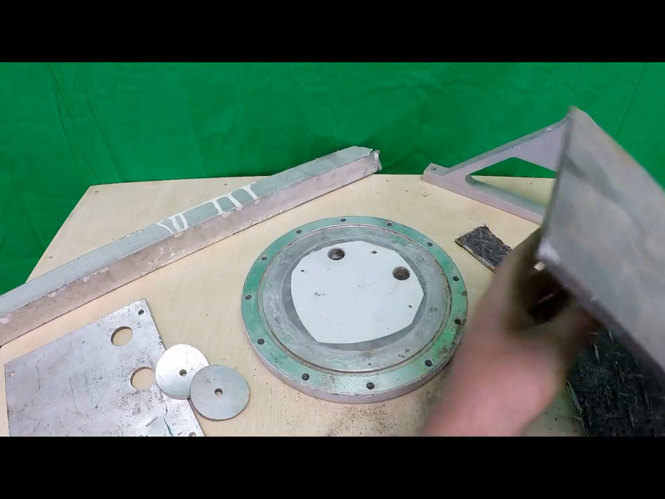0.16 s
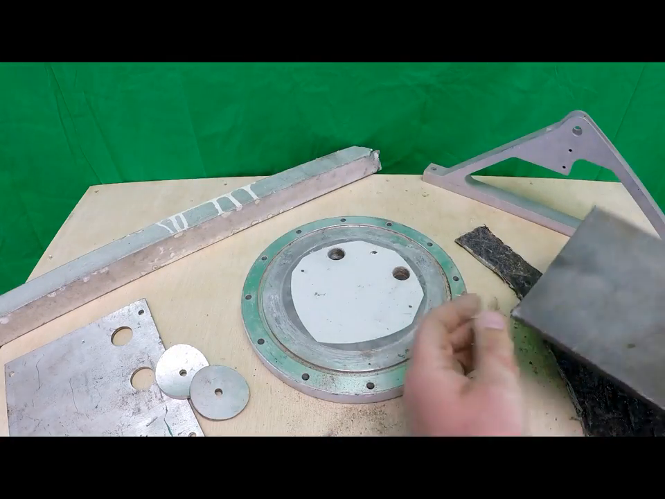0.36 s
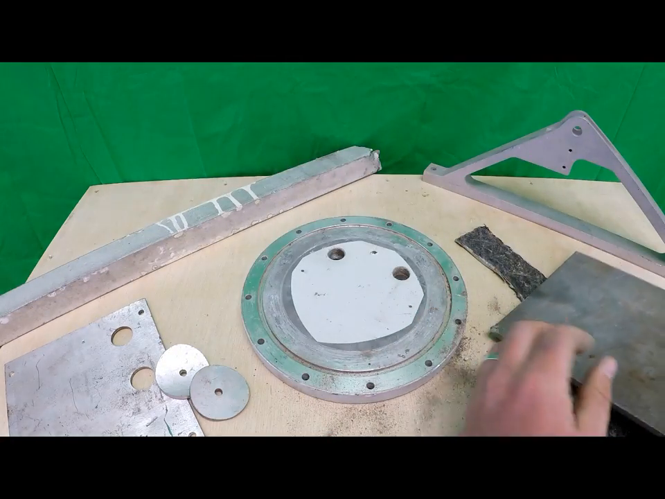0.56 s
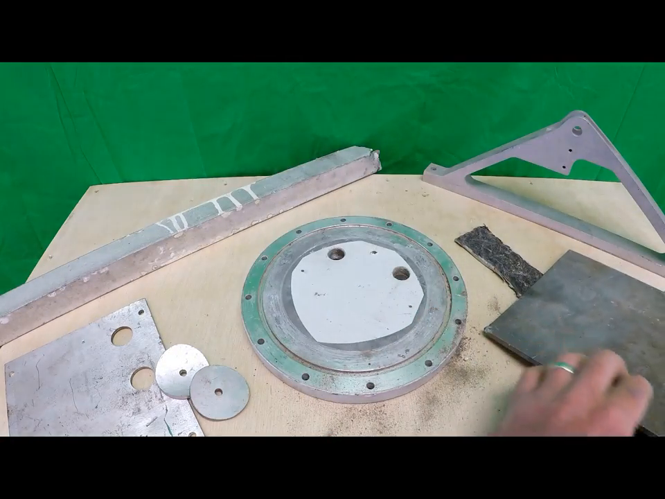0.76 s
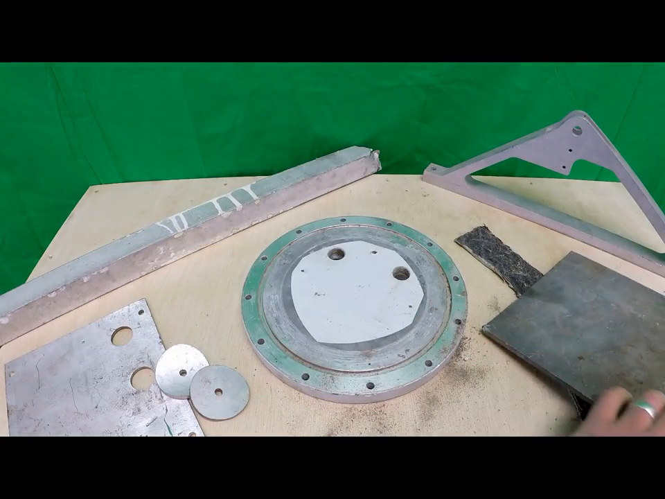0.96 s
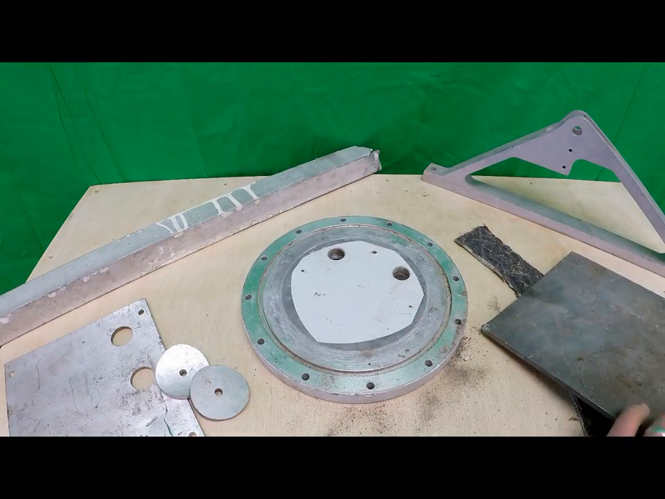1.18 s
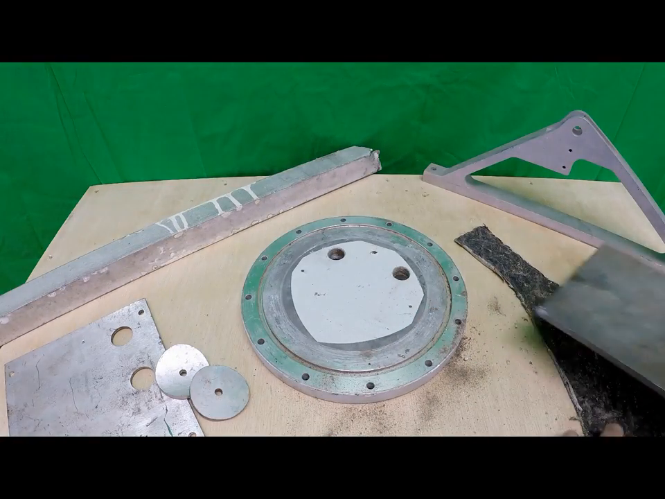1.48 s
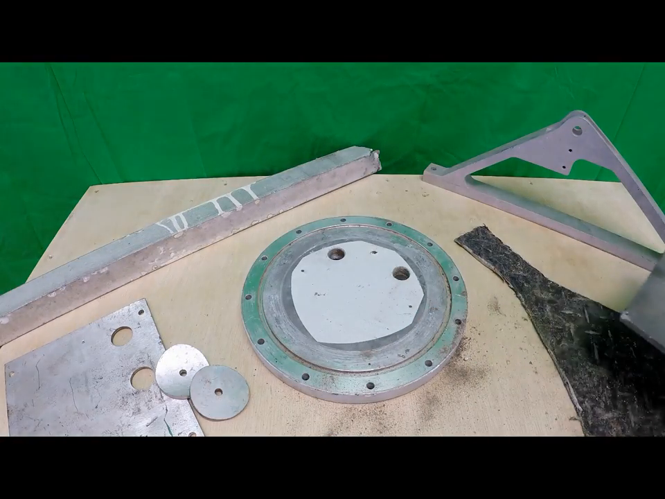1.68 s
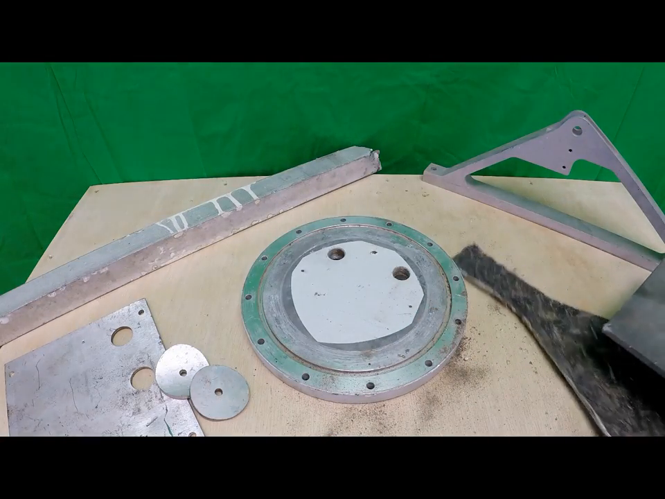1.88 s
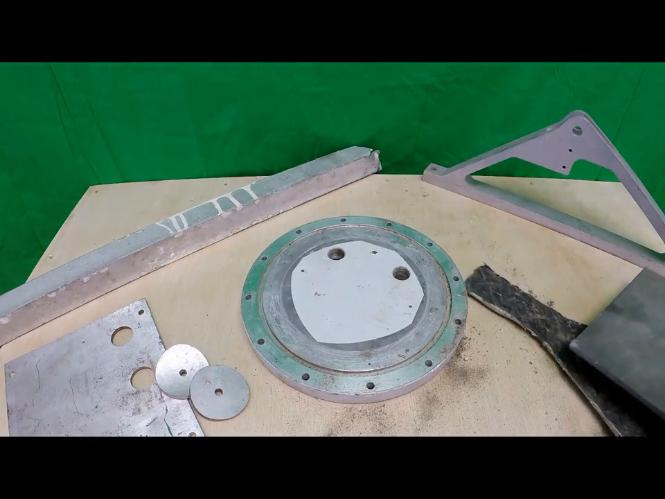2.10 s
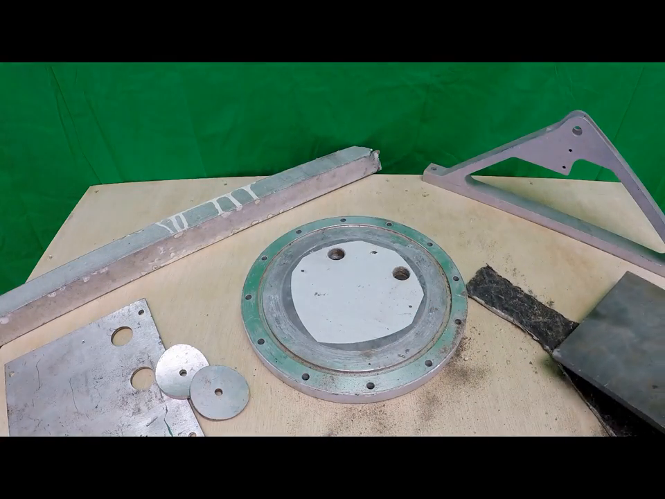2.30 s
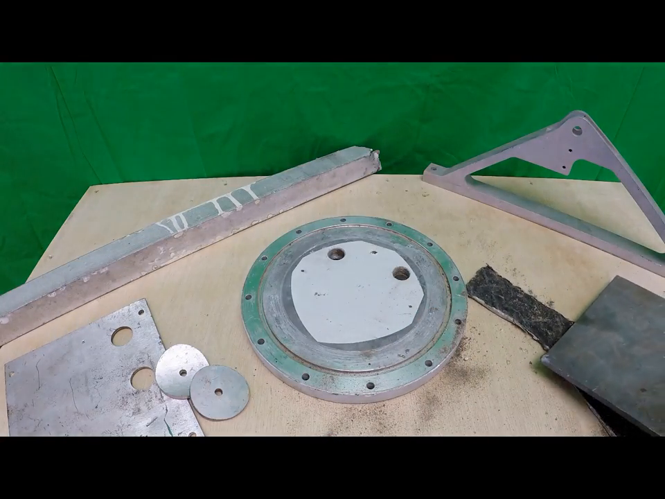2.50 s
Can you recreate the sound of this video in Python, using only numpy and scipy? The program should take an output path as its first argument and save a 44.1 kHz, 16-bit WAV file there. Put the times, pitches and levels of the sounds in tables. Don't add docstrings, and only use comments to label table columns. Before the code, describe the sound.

A metal plate knocks on a wooden table. Quiet room hum opens, with tiny ticks near 0.6 s; the plate lands with a boomy double thud at 0.7-0.9 s. Faint scrapes and sleeve rustle follow around 1.4 s, then a dull bump at 1.7 s. From 1.9 to 2.3 s it drags loudly, clanking, gritty and briefly juddering, then drops with a low thud and quickly fades in the small room.

```python
import sys
import numpy as np
from scipy import signal
from scipy.fft import rfft, irfft
from scipy.io import wavfile
from scipy.ndimage import uniform_filter1d

SR = 44100
rng = np.random.default_rng(int(sys.argv[2]) if len(sys.argv) > 2 else 0)


def log_audio(samples):
    frames = np.atleast_2d(samples).T
    limited = np.clip(frames, -1, 1)
    pcm = np.round(limited * 32767).astype(np.int16)
    wavfile.write(sys.argv[1], SR, pcm)


def invert_db(x):
    u = np.asarray(x, float) / 20
    return 10 ** u


N = 116865


def evened(x):
    return x / np.sqrt(np.mean(x ** 2) + 1e-20)


def read(points, hz):
    f, value = np.transpose(points)
    return np.interp(np.log(hz + 1), np.log(f + 1), value)


def colour(x, points):
    hz = np.fft.rfftfreq(N, 1 / SR)
    return evened(irfft(rfft(x) * invert_db(read(points, hz)), N))


def drift(seconds):
    size = round(seconds * SR)
    smooth = uniform_filter1d(rng.standard_normal(N), size)
    return evened(uniform_filter1d(smooth, size))


def ports(x, other, balance, phase, same):
    hz = np.fft.rfftfreq(N, 1 / SR)
    c = np.clip(read(same, hz), 0, 1)
    half = invert_db(read(balance, hz) / 2) * np.exp(.5j * read(phase, hz))
    a, b = rfft(x), rfft(other)
    first = a * half
    second = (c * a + np.sqrt(1 - c * c) * b) / half
    return irfft(np.array([first, second]) / abs(half + c / half) * 2, N)


# time_s, level_db, top_hz
SLEEVES = [(0, -90.5, 12600), (0.4, -86.5, 12600), (.51, -81.5, 12800), (0.54, -81.5, 14800),
           (0.66, -76, 14100), (0.72, -78.5, 13050), (0.77, -83.5, 11400), (0.961, -83.5, 12560),
           (1.25, -78, 13230), (1.36, -74, 14200), (1.6, -73.5, 15000), (1.851, -72, 13400),
           (1.89, -80, 10100), (2.279, -90.5, 9960), (2.31, -83, 12600), (2.4, -90, 11500),
           (2.65, -99, 11500)]
# freq_hz, level_db
CLOTH_HISS = [(1760, -48.5), (3500, -33), (6000, -7), (7200, -3.5), (9620, 0), (12400, -6), (14000, -9.5),
              (15400, -14.5)]


def rustle():
    patchy_db, fringe_db, fringe_hz = 1.5, 7.0, 2200
    hz, t, z = signal.stft(rng.standard_normal((2, N)), SR, nperseg=512)
    s, db, top_hz = np.transpose(SLEEVES)
    above = hz[:, None] - np.interp(t, s, top_hz)
    patches = uniform_filter1d(rng.standard_normal(above.shape), size=7, axis=0)
    patches = evened(uniform_filter1d(patches, size=4, axis=1))
    depth_db = patchy_db + fringe_db * np.clip(1 + above / fringe_hz, 0, 1)
    level_db = np.interp(t, s, db) + read(CLOTH_HISS, hz)[:, None] + 6.0
    cut_db = 30.0 * np.clip(above / 250, 0, 1)
    z = z * invert_db(level_db + depth_db * patches - cut_db)
    return signal.istft(z, SR, nperseg=512)[1][:, :N]


# freq_hz, level_db
ROOM_HUM = [(8.8, -25), (15, 8), (107, -5), (134, -19.5), (245, -21.5), (390, -28.5), (497, -21),
            (769, -37.5), (1000, -48), (5000, -64), (11000, -120)]
# freq_hz, balance_db
FAR_BALANCE = [(60, -1), (3000, -10.5), (10000, -3)]
# freq_hz, phase_rad
FAR_PHASE = [(30, 0.11), (600, 0.49)]
# freq_hz, shared_0_to_1
FAR_SHARED = [(100, 1), (600, 0.67), (4000, 0.27)]


def air():
    lumps = invert_db(-61 + 2 * drift(0.017))
    one, other = (lumps * colour(rng.standard_normal(N), ROOM_HUM) + hiss for hiss in rustle())
    return ports(one, other, FAR_BALANCE, FAR_PHASE, FAR_SHARED)


def ring(x, hz, width):
    r = np.exp(-np.pi * width / SR)
    return signal.lfilter([1, 0, -1], [1, -2 * r * np.cos(2 * np.pi * hz / SR), r * r], x)


# start_s, peak_db, pitch_hz, second_pitch_hz, t60_s
TOUCHES = [(0.002, -73.5, 4420, 4000, 0.29), (0.583, -50.5, 4640, 5820, 0.0084),
           (0.584, -58, 8470, 11800, .008), (0.993, -60, 3700, 3670, 0.017), (.995, -64, 5870, 6500, .015),
           (1.015, -65.5, 3900, 5900, 0.058), (1.349, -50.5, 3960, 2200, 0.014),
           (1.349, -54, 6230, 2640, 0.013), (1.418, -51, 3570, 2200, 0.044), (1.68, -35, 3810, 1870, 0.011),
           (1.681, -51, 4750, 6500, 0.015), (1.732, -51, 698, 3400, 0.028), (1.904, -15, 420, 418, 0.075),
           (1.974, -20.5, 418, 420, 0.18), (1.87, -29, 3790, 5240, 0.021),
           (2.042, -30.5, 6020, 3820, 0.023), (2.039, -29, 660, 944, 0.024),
           (2.203, -30.5, 3830, 1820, 0.018), (2.204, -32.5, 4370, 5556, 0.023),
           (2.273, -36.5, 3620, 2860, 0.09), (2.31, -40, 6080, 4020, 0.025),
           (2.32, -40.5, 4970, 4195, 0.058)]


def ticks():
    spot_width = 0.12
    out, t = np.zeros(N), np.arange(9000) / SR
    for s, db, hz, second_hz, t60 in TOUCHES:
        attack = np.minimum(t / 0.00063, 1)
        snap = rng.standard_normal(len(t)) * invert_db(-60 * t / t60) * attack
        tap = invert_db(-7.0) * evened(ring(ring(snap, hz, 0.92 * hz), hz, 1.4 * hz))
        for f in (hz, second_hz):
            tap = tap + evened(ring(ring(snap, f, spot_width * f), f, 2 * spot_width * f))
        part = out[round(s * SR):][:len(t)]
        part += invert_db(db) * tap / abs(tap).max()
    return out


def slips():
    slips_per_s, spread_db = 2500, 2.5
    size = invert_db(spread_db * np.minimum(rng.exponential(1, N), 5))
    sign = rng.choice([-1., 1.], N)
    return evened(size * sign * (rng.random(N) < slips_per_s / SR))


def steady(x):
    power = abs(uniform_filter1d(x ** 2, round(0.044 * SR)))
    return x / np.sqrt(power + 0.014)


def body(modes, wander_db, soft_hz):
    force, x = slips(), 0
    for hz, width, db in modes:
        mode = evened(ring(ring(force, hz, width), hz, 4 * width))
        x = x + invert_db(db + wander_db * drift(0.024)) * steady(mode)
    return evened(signal.sosfilt(signal.butter(4, soft_hz, fs=SR, output="sos"), x))


# freq_hz, level_db
WOOD_TONE = [(60, -32.5), (250, -24), (450, 9.5), (800, 2), (1300, -13), (2200, -24.5), (5000, -65)]


def wood_clicks():
    return colour(slips(), WOOD_TONE)


# freq_hz, width_hz, level_db
TABLE_MODES = [(152.2, 31, 11), (177.7, 16, -9.5), (224.6, 16, -5), (271.1, 19, -6)]
# freq_hz, width_hz, level_db
BOARD_MODES = [(384.7, 31, 0), (422.8, 22, 0), (559, 60, 4), (616.3, 28, -0.5), (666.4, 6.7, -2)]
# freq_hz, width_hz, level_db
FINGER_SPOTS = [(2200, 570, -3.5), (3400, 200, -3.5), (3700, 210, 1), (4300, 220, -9), (5800, 200, -9),
                (6360, 250, -8)]
# freq_hz, level_db
RASP_TONE = [(1100, -2.5), (2100, -5.5), (2900, -17.5), (3750, -3.5), (4900, -9), (5900, -9.5),
             (7200, -20.5), (12000, -47)]


def blunt_layers():
    low = steady(body(TABLE_MODES, 3.0, 300))
    thud = evened(body(BOARD_MODES, 0.77, 800) + invert_db(-8.0 - 6) * wood_clicks())
    rasp = evened(body(FINGER_SPOTS, 4.8, 8100) + invert_db(-3.5) * colour(slips(), RASP_TONE))
    return low, steady(thud), rasp


# freq_hz, width_hz, level_db
LOADED_MODES = [(141.7, 24, -10.5), (176, 54, 5), (232.4, 14, -3), (283.3, 22, -4.5)]
# freq_hz, width_hz, level_db
PLATE_MODES = [(421, 12, 11), (435, 14, -1.5), (524, 14, -9.5), (613, 10, 4.5), (637, 18, 10),
               (664, 13, -9), (764.7, 27, -1), (793, 5.2, -8.5), (923.5, 8.7, -3), (1089, 6, -8),
               (1175, 9.6, -6.5), (1214, 30, -7.5), (1296, 30, -3)]
# freq_hz, width_hz, level_db
EDGE_MODES = [(1488, 25, 0), (1721, 46, 5), (1848, 27, 0.5), (2114, 28, 1.5), (2422, 33, 6.5),
              (2688, 60, 6.5), (2762, 78, 0.5), (3213, 50, 1), (3390, 68, 6.5), (3810, 67, 0),
              (4120, 90, -2), (4270, 20, -13.5),
              (4716, 50, -8.5), (5075, 92, 1), (5900, 70, -14), (5930, 69, -4.5), (6400, 30, -11),
             (6320, 32, -4), (6620, 18, -11), (7220, 40, -12.5), (8760, 84, -13)]
# freq_hz, level_db
GRIT_TONE = [(700, -33.5), (1200, -3.5), (6400, -11), (7800, -23.5), (9850, -24.5), (10150, -64.5),
             (11300, -37), (13400, -67)]


def sliding_layers():
    low = steady(body(LOADED_MODES, 5.2, 420))
    knock = evened(body(PLATE_MODES, 5, 1200) + invert_db(-6) * wood_clicks())
    highpass = signal.butter(3, 1100, "high", fs=SR, output="sos")
    edge = signal.sosfilt(highpass, body(EDGE_MODES, 3.1, 9600))
    grit = evened(edge + invert_db(-6.5) * colour(slips(), GRIT_TONE))
    return low, steady(knock), steady(grit)


# start_s, peak_db, t60_s
LANDINGS = [
    (0.718, -27.5, 0.093),
    (2.334, -29.5, 0.089),
]
# freq_hz, level_db
LANDING_TONE = [(400, -23), (900, 11), (1600, -8), (4500, -28.5), (9000, -73.5)]


def blows():
    t, out = np.arange(N) / SR, np.zeros(N)
    crack = colour(slips(), LANDING_TONE)
    for s, db, t60 in LANDINGS:
        attack = np.clip((t - s) / 0.0046, 0, 1)
        out += crack * attack * invert_db(db - 60 * abs(t - s) / t60)
    return out


# start_s, load_db (on the table), knock_db (re load), grit_db (re load)
SETTING_DOWN = [
    (0.707, -72.5, -11.5, -17),
    (0.72, -41, 2.5, -14),
    (0.734, -27, 7, -47.5),
    (.786, -25.5, -8, -38.5),
    (0.804, -34.5, 6, -33.5),
    (0.827, -28, -7, -45.5),
    (0.872, -41.5, 3, -24.5),
    (0.903, -41.5, -11.5, -35.5),
    (0.981, -72, -3.5, -32.5),
]
LIFTING = [
    (1.36, -65.5, -5, -6.5),
    (1.403, -71.5, -13, 1),
    (1.427, -50, -18, -15.5),
    (1.471, -60, -20, -13),
    (1.619, -67, -8, -20),
]
BUMPING = [
    (1.673, -52, -19.5, -10.5),
    (1.695, -32.5, -3.5, -33.5),
    (1.722, -28, -18.5, -26.5),
    (1.763, -38, -3, -20),
    (1.786, -39, -18.5, -23.5),
    (1.801, -45, -15, -27),
    (1.835, -54.5, -12, -15),
]
DRAGGING = [
    (1.837, -57, -14, -8),
    (1.877, -23, -0.5, -16),
    (1.922, -23.5, 5.5, -10.5),
    (1.947, -25, 6.5, -1.5),
    (1.974, -22.5, 7, -2.5),
    (2.012, -23, 9, -5),
    (2.025, -26, 1.5, -7.5),
    (2.065, -26.5, 7, -7),
    (2.113, -26.5, 3, -15),
]
CREEPING = [
    (2.116, -27, 1, -13.5),
    (2.136, -23.5, -2.5, -17.5),
    (2.167, -29.5, -3, -16.5),
    (2.188, -32.5, -2, -9.5),
    (2.22, -36, 5, -5.5),
    (2.253, -41.5, 1, -4.5),
    (2.289, -44, -6.5, -14.5),
    (2.32, -48, 3, -16.5),
]
SETTLING = [
    (2.322, -36.5, -12.5, -4.5),
    (2.34, -27, -2.5, -64),
    (2.358, -23, -2, -51),
    (2.375, -29.5, -10.5, -43),
    (2.411, -35, -4, -43),
    (2.439, -44.5, -16, -51),
    (2.495, -50.5, -26.5, -57),
    (2.621, -81, -16, -37),
]
STAND_SHAKE = [
    -9.5,
    4.5,
    -4.5,
    -15,
    -12,
    -17.5,
]
# freq_hz, level_db
STAND_TONE = [(8.8, -27), (15, -16), (32, 18), (92, 10.5), (110, -7), (140, -26), (240, -120)]


def contact():
    t, out = np.arange(N) / SR, np.zeros(N)
    blunt, sliding = blunt_layers(), sliding_layers()
    stand = steady(colour(rng.standard_normal(N), STAND_TONE))
    handlings = SETTING_DOWN, LIFTING, BUMPING, DRAGGING, CREEPING, SETTLING
    layers = blunt, blunt, blunt, sliding, sliding, blunt
    for table, (low, mid, high), shake_db in zip(handlings, layers, STAND_SHAKE):
        s, load_db, knock_db, grit_db = np.transpose(table)
        edges = np.minimum(t - s[0], s[-1] - t) / .008 + .5
        force = np.sin(np.pi / 2 * np.clip(edges, 0, 1)) * invert_db(np.interp(t, s, load_db))
        knock, grit = invert_db(np.interp(t, s, knock_db)), invert_db(np.interp(t, s, grit_db))
        out += force * (low + knock * mid + grit * high)
        slow_force = uniform_filter1d(force, round(0.024 * SR))
        out += invert_db(shake_db) * stand * np.interp(t - 0.047, t, slow_force)
    return out + blows()


# start_s, end_s, slips_per_s, level_db
SHUDDER = (2.02, 2.18, 75, -16.5)
# multiple, level_db
SHUDDER_HARMONICS = [(2, 0), (3, -5)]


def judder():
    start, end, hz, db = SHUDDER
    t = np.arange(N) / SR
    turns = np.cumsum(hz * (1 + .025 * drift(.02))) / SR
    hold = np.clip(np.minimum(t - start, end - t) / .03, 0, 1)
    wave = sum(invert_db(d) * np.cos(2 * np.pi * k * turns) for k, d in SHUDDER_HARMONICS)
    return hold * invert_db(db + drift(0.0067)) * wave


def room(x):
    bass_t60, treble_t60 = 0.16, 0.079
    t = np.arange(SR // 2) / SR
    noise = rng.standard_normal(len(t))
    bass = signal.lfilter(*signal.butter(2, 1500, fs=SR), noise)
    tail = bass * invert_db(-60 * t / bass_t60) + (noise - bass) * invert_db(-60 * t / treble_t60)
    tail = tail * (t > .004)
    return signal.fftconvolve(x, tail / np.linalg.norm(tail))[:N]


# freq_hz, balance_db
NEAR_BALANCE = [(60, -1), (200, -2.5), (400, -4), (640, -13), (1200, -2.5), (4000, -2.5), (9000, -5)]
# freq_hz, phase_rad
NEAR_PHASE = [(60, 0.09), (250, 0.11), (430, 0.41), (620, 1.5), (1200, 2.28), (2400, 0.64), (5000, 1.1)]
# freq_hz, shared_0_to_1
NEAR_SHARED = [(100, .99), (1000, .96), (4000, .75), (12000, .4)]


def scene():
    near = ticks() + contact() + judder()
    wet = near + invert_db(-15) * room(near)
    return ports(wet, room(near), NEAR_BALANCE, NEAR_PHASE, NEAR_SHARED) + air()


def low_pass(x):
    return signal.sosfilt(signal.butter(12, 15580, fs=SR, output="sos"), x)


def record(dry):
    mix = 0.86 * np.tanh(dry / 0.94)
    return low_pass(mix)


dry = scene()
out = record(dry)
log_audio(out)
```